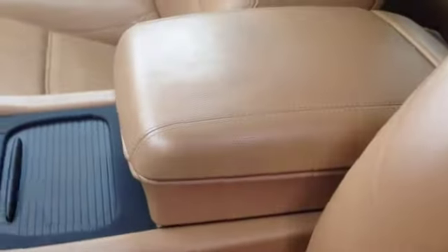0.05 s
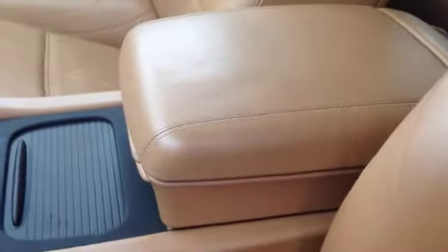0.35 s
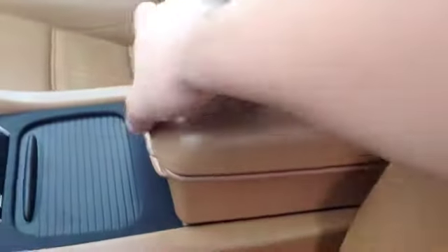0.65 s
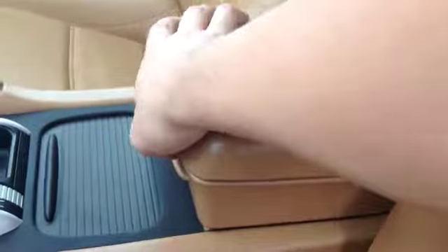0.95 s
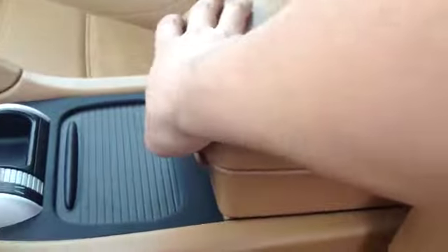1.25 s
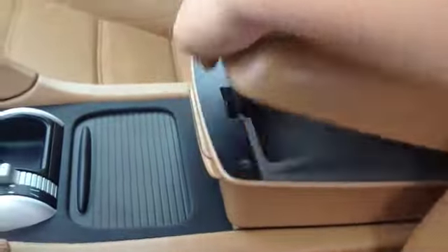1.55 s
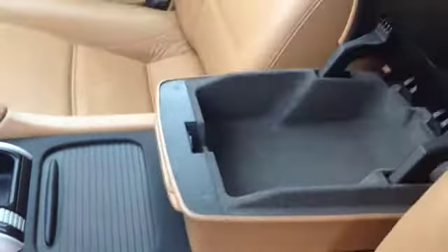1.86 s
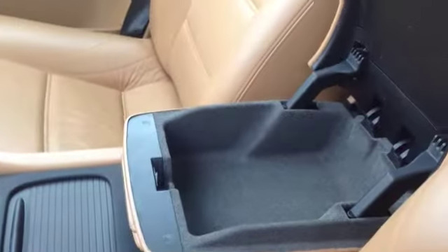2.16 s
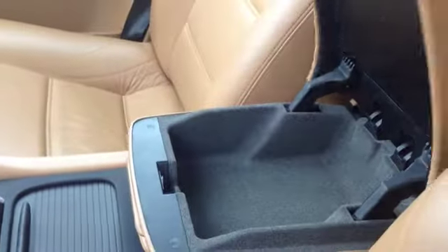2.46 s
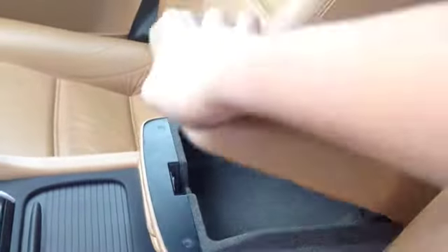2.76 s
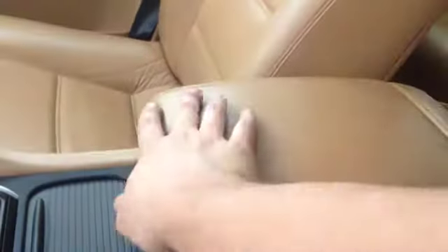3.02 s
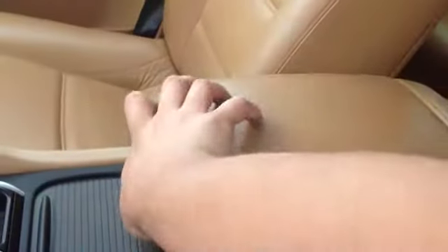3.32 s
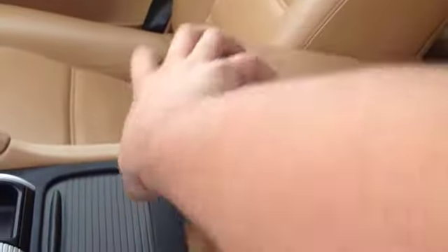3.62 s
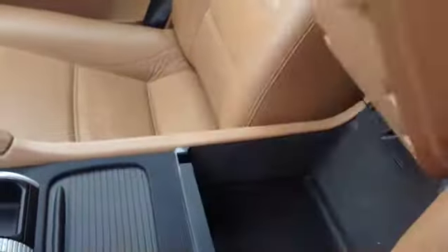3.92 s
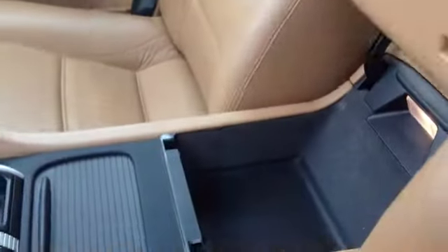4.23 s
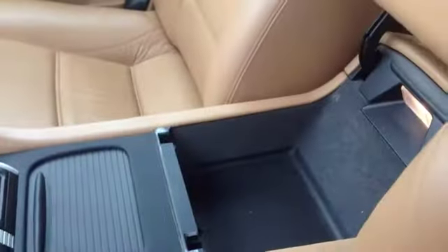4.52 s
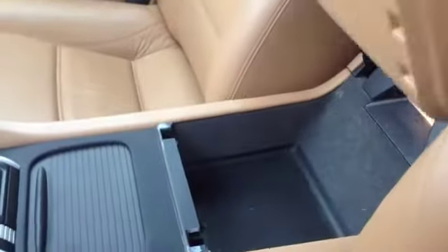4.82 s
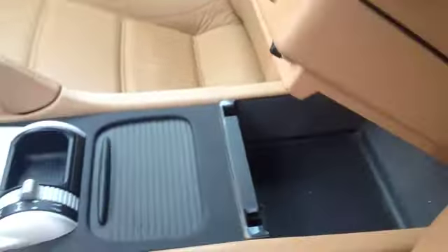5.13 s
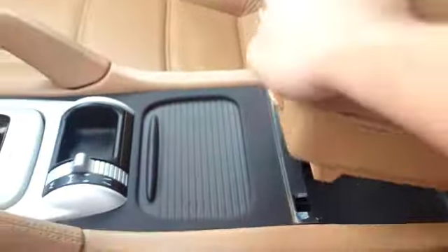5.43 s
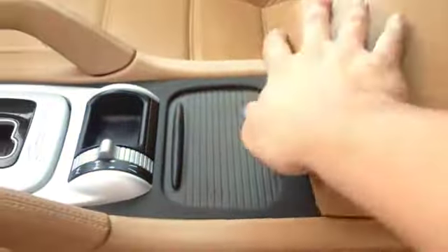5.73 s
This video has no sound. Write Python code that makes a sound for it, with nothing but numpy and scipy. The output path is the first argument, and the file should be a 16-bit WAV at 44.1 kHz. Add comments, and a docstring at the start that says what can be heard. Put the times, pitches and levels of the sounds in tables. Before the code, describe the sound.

Inside a parked car, a palm rubs softly over a leather armrest. The latch clicks several times, the lid knocks open against its stop and is slapped shut. The catch snaps again as the deeper compartment opens with another knock, and after a brief scrape the lid slams down, the loudest sound. Everything is close and fairly dry, over a faint hum and a soft hiss of air.

```python
"""Three tiny dry clicks, then a palm rubbing over the leather armrest of a parked car's centre console.
The latch clicks, the lid swings up against its stop and is slapped shut; then the deep compartment is
opened and slammed. Each contact cracks on the plastic shell and rings the console, the sprung catch
zings, and the leather swishes and squeaks as it sticks and slips. The small padded cabin answers
briefly, over a faint hum, a wandering drone and a soft hiss of air."""
import sys
import numpy as np
from scipy import signal
from scipy.fft import rfft, irfft
from scipy.io import wavfile
from scipy.ndimage import uniform_filter1d

SR = 44100
rng = np.random.default_rng(int(sys.argv[2]) if len(sys.argv) > 2 else 0)


def materialize(psi):
    """Save the field psi as 16-bit PCM at rate SR to the path in sys.argv[1].

    A 1-D psi becomes a single channel; in a 2-D psi each row is a channel.
    """
    bounded = np.clip(np.atleast_2d(psi).T, -1, 1)
    quanta = np.round(bounded * 32767).astype(np.int16)
    wavfile.write(sys.argv[1], SR, quanta)


N = 254898

# single hits of latch, hinge and lid: t/s, level/dB, hardness/dB
KNOCKS = [(0.222, -57.5, -8.5), (0.325, -55.5, 2), (0.583, -61, 2.5), (0.658, -56, 2), (0.836, -50.5, 5),
          (0.853, -50, 1), (0.861, -42.5, 5.5), (0.883, -46.5, -0.5), (0.916, -41, -0.5), (0.932, -38.5, 3),
          (1.084, -40.5, 1.5), (1.209, -51, -3), (1.324, -49, -0.5), (1.421, -43.5, 2.5), (1.480, -41, 2),
          (1.490, -38.5, 4.5), (1.5167, -37.5, 3), (1.619, -52, 1), (1.945, -45.5, -4.5),
          (1.956, -39, -4.5), (1.993, -44.5, -4.5), (2.016, -30, -3), (2.0249, -26.5, -1.5),
          (2.055, -46, -5), (2.445, -52, -8.5), (2.764, -48.5, 6.5), (3.407, -52.5, 5), (3.4895, -40, 0),
          (3.493, -27.5, 1), (3.533, -44, -1.5), (3.603, -59.5, -10), (3.62, -46.5, -6.5),
          (3.67, -53.5, -6), (3.869, -50.5, 0.5), (4.046, -34.5, 1), (4.107, -52.5, 0.5),
          (4.488, -61, -2.5), (4.814, -54.5, 6), (4.865, -48.5, 5)]
# the lid thrown shut: landing t/s, level/dB, hardness/dB, latch travel/s
SLAMS = [(2.987, -24, 0, .0173), (5.608, -19.5, 0.95, .025)]
# inside a slam the latch touches and rides over its catch, the lid lands, the latch snaps home and the
# lid settles: delay from landing/latch travels, level offset/dB, hardness offset/dB
SLAM_STEPS = [(-1, -10, 3), (-.55, -6, 6), (0, -4, -4), (.12, -1, 7), (.33, -3, 2.5), (.9, -15.5, -3.5)]
def contacts(taps_per_s=2, tap_db=-65, tap_spread_db=0.5, tap_hardness_db=1.5):
    """The hit list as (t/s, level/dB, hardness/dB): knocks, slam steps, faint taps of fingers and trim."""
    slams = [(s + delay * latch_s, db + step_db, hardness + step_hardness)
             for s, db, hardness, latch_s in SLAMS for delay, step_db, step_hardness in SLAM_STEPS]
    chance = rng.random((int(taps_per_s * N / SR), 2))
    taps = [(when * N / SR, tap_db + tap_spread_db * (2 * size - 1), tap_hardness_db)
            for when, size in chance]
    return KNOCKS + slams + taps


# balance of thud, clack, snap and edge, a row each: level offset/dB, tilt/dB per dB of hardness
HIT_BALANCE = [(-10.5, -0.8), (-0.5, -0.9), (0.5, 0.63), (-14, 1.5)]
def lid(boom_db=11, boom_slope=1.61):
    """Hard contacts snap and soft ones thud; the boom grows faster than the thud, favouring heavy hits."""
    out, t = np.zeros(N), np.arange(SR // 4) / SR
    plain_db, tilt = np.transpose(HIT_BALANCE)
    for s, db, hardness in contacts():
        band_db = db + plain_db + hardness * tilt
        add(out, s, knock(t, band_db))
        add(out, s, boom(t, boom_db + boom_slope * band_db[0]))
    return out


# the thud, clack, snap and edge bands: low f/Hz, high f/Hz
HIT_BANDS = [(125, 480), (480, 2800), (2800, 6000), (6000, 16000)]
# the console's ring under every hit: f/Hz, relative level/dB, t60/s
CONSOLE_MODES = [(215, -7, .11), (274, -1, .1), (370, 0, .1), (432, -3, .1), (628, -6, .08), (680, -7, .07),
                 (1060, -6, .08), (1285, -4, .08), (1450, -2, .08), (1780, -4, .07), (2200, -4, .08),
                 (3020, -7, .07), (3260, -7, .06), (3860, -2, .07), (4200, -3, .07), (4550, -1, .07),
                 (4995, 3, .07), (5150, 1, .065), (5370, 3, .065), (5560, 0, .07)]
# EQ of a hit on the plastic shell: f/Hz, relative level/dB
SHELL_EQ = [(60, 1), (130, -11), (260, -5.5), (400, -1), (520, -8.5), (800, 1), (1500, -0.5), (2700, -7),
            (4000, -0.5), (5300, 0.5), (6800, -7.5), (8200, -11), (10000, -22), (15000, -27)]
def knock(t, band_db, crack=8, ring_db=-4, blow_s=0.009):
    """One contact: a crack, its reflections and the console's ring, mixed band by band."""
    click = cabin(t)
    click[0] += crack
    hz, db, t60 = np.transpose(CONSOLE_MODES)[:, :, None]
    detune, strength, phase = rng.standard_normal((len(CONSOLE_MODES), 3)).T[:, :, None]
    cycles = hz * (1 + 0.0071 * detune) * t + phase
    modes = undb(db + 2 * strength) * fade(t, t60) * np.sin(2 * np.pi * cycles)
    hit = unit(colour(click, SHELL_EQ)) + undb(ring_db) * unit(modes.sum(axis=0))
    parts = [undb(level) * unit(band(hit, lo, hi, order=4)) for level, (lo, hi) in zip(band_db, HIT_BANDS)]
    # a band's level is its energy spread over the length of the blow
    return sum(parts) * np.sqrt(blow_s / t[-1])


def boom(t, peak_db, swell_s=0.025, t60=0.3):
    """A blow on the lid shakes the low air modes of the cabin, which take a moment to swell."""
    rumble = band(rng.standard_normal(len(t)) * fade(t, t60) * (1 - fade(t, swell_s)), 100, 230)
    return undb(peak_db) * rumble / np.abs(rumble).max()


def landings(thump_offset_db=-7.5):
    """On each slam the padded lid's weight thumps the console's lowest modes: the thud band alone."""
    out, t = np.zeros(N), np.arange(SR // 4) / SR
    for s, db, _, _ in SLAMS:
        add(out, s, knock(t, [db + thump_offset_db], ring_db=1))
    return out


# the catch flicks free: t/s, gain/dB
CATCH_RELEASES = [(1.5163, -41), (3.492, -25.5)]
# EQ of its thin, bright zing: f/Hz, gain/dB
ZING_EQ = [(4000, -28), (6300, -1), (8600, -1), (10500, -25.5), (12500, -11), (15000, -17)]
def catch_zings():
    """The sprung catch flies back and its zing bounces round the cabin."""
    out, t = np.zeros(N), np.arange(SR // 4) / SR
    for s, db in CATCH_RELEASES:
        add(out, s, undb(db) * colour(cabin(t), ZING_EQ))
    return out


# hits that set one panel or latch part singing: t/s, f/Hz, level/dB
PANEL_NOTES = [(0.883, 260, -36.5), (1.084, 890, -34), (1.422, 2650, -36), (1.623, 385, -40.5),
               (2.025, 613, -26), (2.444, 1023, -31.5), (2.986, 273, -17.5), (2.987, 362, -19.5),
               (3.62, 1127, -39), (4.046, 369, -33), (4.047, 1410, -27), (4.048, 2700, -27),
               (4.778, 275, -41), (5.188, 405, -46.5), (5.289, 380, -46.5), (5.609, 1453, -18),
               (5.609, 381, -22.5), (5.612, 194.4, -22)]
def panel_notes(build_s=0.0028, t60_at_1khz=0.057, damping=0.42):
    """One mode stands out of a knock, building as the first reflections arrive; high ones die sooner."""
    out, t = np.zeros(N), np.arange(SR // 4) / SR
    for s, hz, db in PANEL_NOTES:
        t60 = t60_at_1khz * (hz / 1000) ** -damping
        envelope = (1 - np.exp(-t / build_s)) * fade(t, t60)
        add(out, s, undb(db) * envelope * np.sin(2 * np.pi * hz * t))
    return out


# the opening clicks: t/s, f/Hz, level before the filter/dB, rise and decay time/s
DRY_CLICKS = [(0.0264, 6740, -19.5, 0.000048), (0.0457, 6100, -25, 0.00035), (.0556, 6170, -5, 0.00012)]
def dry_clicks():
    """Three tiny, dry, high clicks with no reverberation."""
    out, t = np.zeros(N), np.arange(N) / SR
    for s, hz, db, decay_s in DRY_CLICKS:
        out += undb(db) * np.exp(-np.abs(t - s) / decay_s) * np.cos(2 * np.pi * hz * (t - s))
    return band(out, 4200, 14000)


# strokes of the hand, before the trims: start t/s, end t/s, swish level/dB, drag level/dB
STROKES = [(-.05, 0.005, -52.5, -52), (0.205, .53, -63.5, -62), (0.623, 0.993, -61, -58.5),
           (1.082, 1.32, -59.5, -54), (1.374, 1.697, -55, -55.5), (1.66, 1.904, -63, -64.5),
           (2.106, 2.17, -69, -57.5), (2.279, 2.802, -63, -57), (2.86, 3.288, -58.5, -56),
           (3.361, 3.558, -60, -56.5), (3.87, 4.053, -61.5, -56.5), (4.195, 4.323, -63.5, -59),
           (4.884, 4.965, -65.5, -61), (5.101, 5.195, -63, -59), (5.262, 5.355, -66, -55.5)]
# EQs of the airy swish and the duller drag: f/Hz, relative level/dB
SWISH_EQ = [(1500, -24), (2800, -14), (4300, -6), (5400, 0), (6500, -10), (8500, -17), (11000, -23),
            (15000, -22)]
DRAG_EQ = [(50, -53.5), (130, -13), (270, 8), (430, 9), (1000, 6), (1800, -3.5), (2800, -4), (4500, -43)]
def palm_rub(swish_trim_db=-1, drag_trim_db=-2):
    """The palm swishes over the leather and drags on the padding."""
    swish_level, drag_level = undb(-73), undb(-66)  # the hand never quite rests
    for start, end, swish_db, drag_db in STROKES:
        stroke = swell(start, end, attack_s=0.034, release_s=0.12)
        swish_level = np.maximum(swish_level, undb(swish_db) * stroke)
        drag_level = np.maximum(drag_level, undb(drag_db) * stroke)
    swish = friction(SWISH_EQ, slips_per_s=1500, spread_db=3, uneven_db=1.5)
    drag = friction(DRAG_EQ, slips_per_s=500, spread_db=2, uneven_db=-1)
    return undb(swish_trim_db) * swish_level * swish + undb(drag_trim_db) * drag_level * drag


# two bursts of friction: start t/s, end t/s, level/dB
BURSTS = [(4.739, 4.883, -48.5), (5.326, 5.34, -55)]
# the EQ they share: f/Hz, relative level/dB
BURST_EQ = [(50, -48), (140, -3.5), (270, 3), (420, 9), (700, 1.5), (2000, -3.5), (3600, -0.5), (5300, 7),
            (6600, -1.5), (8200, -8.5), (10000, -16), (15000, -26)]
def scrape_and_swish():
    """A short scrape, then a brief rubbing swish."""
    level = sum(undb(db) * swell(start, end, attack_s=0.0068, release_s=0.032) for start, end, db in BURSTS)
    return level * friction(BURST_EQ, slips_per_s=670, spread_db=0, uneven_db=1)


def friction(eq, slips_per_s, spread_db, uneven_db):
    """Tiny slips of uneven size, smeared by the cabin; the grip tightens and loosens."""
    sizes = undb(spread_db * np.minimum(rng.exponential(size=N), 4))
    slips = (rng.random(N) < slips_per_s / SR) * rng.standard_normal(N) * sizes
    grip = undb(uneven_db * walk(45))
    smeared = signal.fftconvolve(slips * grip, cabin(np.arange(SR // 10) / SR))[:N]
    return unit(colour(smeared, eq))


# faint squeaks of leather and hinge: start t/s, end t/s, f/Hz, level/dB
SQUEAKS = [(.235, .27, 3200, -61), (.67, .84, 1720, -65), (3.045, 3.1, 3400, -62), (5.2, 5.58, 3180, -72)]
def squeaks(jitter=0.025):
    """Stick and slip settle on one thin, unsteady pitch."""
    out, t = np.zeros(N), np.arange(N) / SR
    for start, end, hz, db in SQUEAKS:
        progress = np.clip((t - start) / (end - start), 0, 1)
        arch = np.sqrt(np.abs(np.sin(np.pi * progress)))
        pitch_hz = hz * (1 + jitter * walk(600))
        out += undb(db) * arch * np.sin(2 * np.pi * np.cumsum(pitch_hz) / SR)
    return out


def cabin(t, hold_s=0.0035, t60=0.087, late_db=-27, late_t60=0.085, patchy_db=4.5):
    """The cabin's answer to a click: a crowd of reflections off glass and dash, soaked up by the seats."""
    reflections = unit(rng.standard_normal(len(t)) * undb(patchy_db * rng.standard_normal(len(t))))
    return reflections * (fade(t - hold_s, t60) + undb(late_db) * fade(t, late_t60))


# partials of the low hum: f/Hz, level/dB
HUM = [(67.4, -83), (134.8, -66.5)]
# path of the wandering drone: t/s, f/Hz, level/dB
DRONE = [(0, 152, -70.5), (1.7, 157.9, -71), (2.55, 163.6, -66.5), (2.85, 166, -60), (3.3, 168.2, -57),
         (3.7, 172.3, -70.5), (4.5, 174.8, -66), (4.9, 160, -74.5), (5.8, 164.3, -79.5)]
# EQ of the cabin air: f/Hz, relative level/dB
AIR_EQ = [(25, -36), (50, -26), (90, -6.5), (150, 4), (290, 2), (450, -5), (700, -3.5), (1300, -6.5),
          (2000, -12), (3100, -18.5), (5300, -12.5), (7000, -30.5), (10500, -34), (15000, -29)]
def room_tone(air_db=-59.5, hum_waver_db=1.2, drone_waver_db=3, air_waver_db=0.5):
    """The bed: a low hum at a steady pitch, a drone that swells and sinks, and a soft hiss of air."""
    t = np.arange(N) / SR
    hum = sum(undb(db + hum_waver_db * walk(3.37)) * unit(np.sin(2 * np.pi * hz * t)) for hz, db in HUM)
    drone_hz, drone_db = curves(DRONE)
    drone_tone = unit(np.sin(2 * np.pi * np.cumsum(drone_hz) / SR))
    drone = undb(drone_db + drone_waver_db * walk(3.7)) * drone_tone
    air = undb(air_db + air_waver_db * walk(2.84)) * unit(colour(rng.standard_normal(N), AIR_EQ))
    return hum + drone + air


def undb(db):
    """Decibels to gain."""
    return 10 ** (np.asarray(db) / 20)


def unit(x):
    """Scale to rms 1."""
    return x / np.sqrt(np.mean(x ** 2))


def curves(table):
    """Automation curves, one for each column after t/s."""
    s, *columns = np.transpose(table)
    return [np.interp(np.arange(N) / SR, s, c) for c in columns]


def colour(x, eq, size=4096):
    """Minimum-phase EQ through (f/Hz, gain/dB) points."""
    hz, db = np.transpose(eq)
    f = np.maximum(np.fft.rfftfreq(size, 1 / SR), 1)
    gain = undb(np.interp(np.log(f), np.log(hz), db))
    cepstrum = irfft(np.log(gain))
    cepstrum[1:size // 2] *= 2
    cepstrum[size // 2 + 1:] = 0
    return signal.fftconvolve(x, irfft(np.exp(rfft(cepstrum))))[:len(x)]


def band(x, lo, hi, order=3):
    """Band-pass from lo to hi Hz."""
    return signal.sosfilt(signal.butter(order, [lo, hi], "band", fs=SR, output="sos"), x)


def fade(t, t60):
    """Exponential decay that starts at t = 0."""
    return np.exp(-np.log(1000) * np.maximum(t, 0) / t60)


def swell(start, end, attack_s, release_s):
    """Envelope that rises from start, holds until end and falls."""
    t = np.arange(N) / SR
    return np.clip(np.minimum((t - start) / attack_s, 1 - (t - end) / release_s), 0, 1)


def walk(rate_hz):
    """Smooth random drift, rms 1."""
    k = int(SR / rate_hz)
    steps = np.repeat(rng.standard_normal(N // k + 1), k)
    return unit(uniform_filter1d(uniform_filter1d(steps, k), k)[:N])


def add(track, s, sound):
    """Mix a sound into the track at time s."""
    i = max(int(s * SR), 0)
    track[i:i + len(sound)] += sound[:max(N - i, 0)]


def scene():
    """The mono mix, heard from just above the console."""
    hits = lid() + landings() + catch_zings() + panel_notes() + dry_clicks()
    return (hits + squeaks() + palm_rub() + scrape_and_swish() + room_tone())[None]


def record(dry):
    """A steep high cut at 15.6 kHz."""
    return signal.sosfilt(signal.ellip(8, .2, 70, 15600, fs=SR, output="sos"), dry)


dry = scene()
out = record(dry)
materialize(out)
```